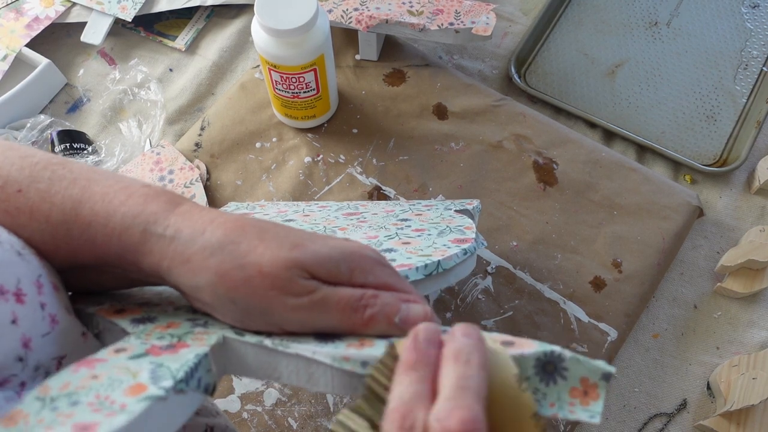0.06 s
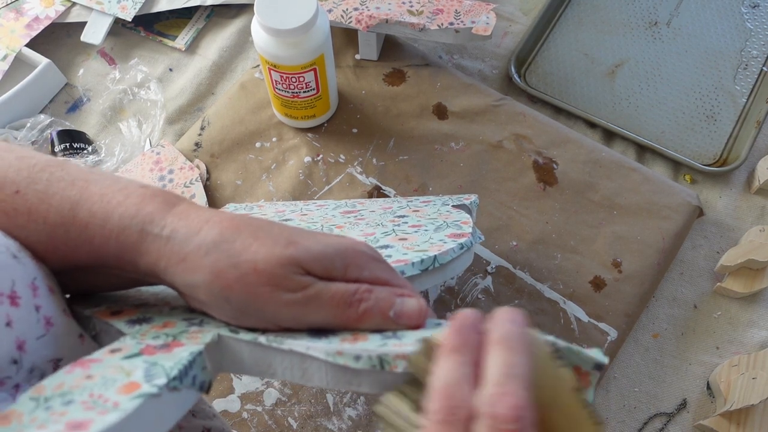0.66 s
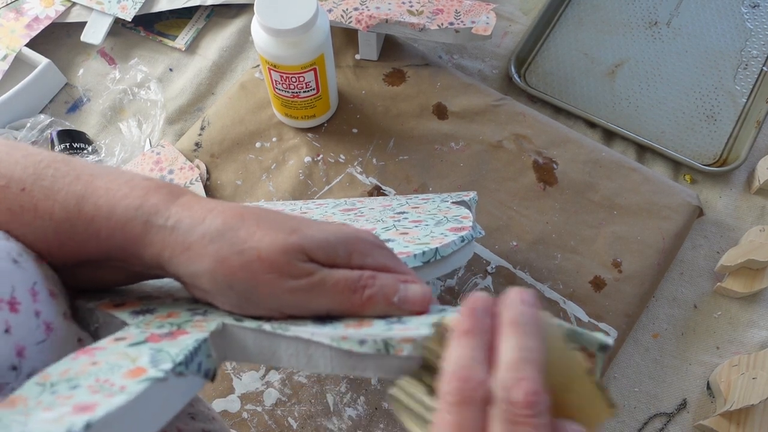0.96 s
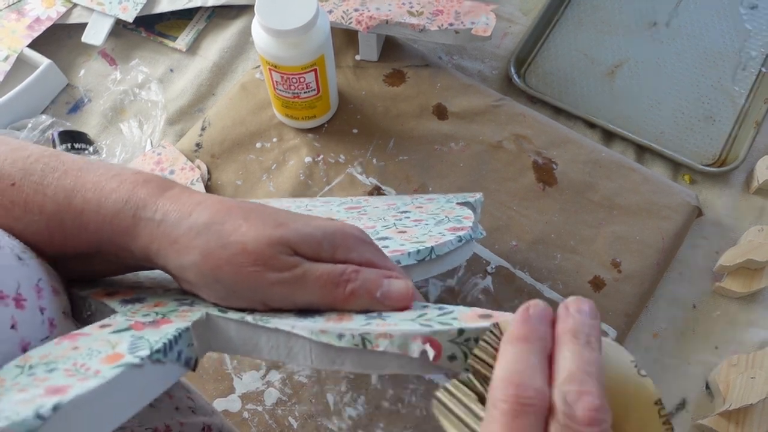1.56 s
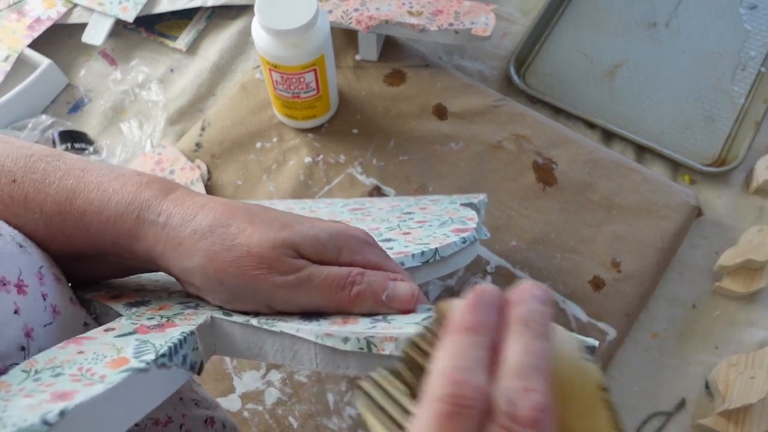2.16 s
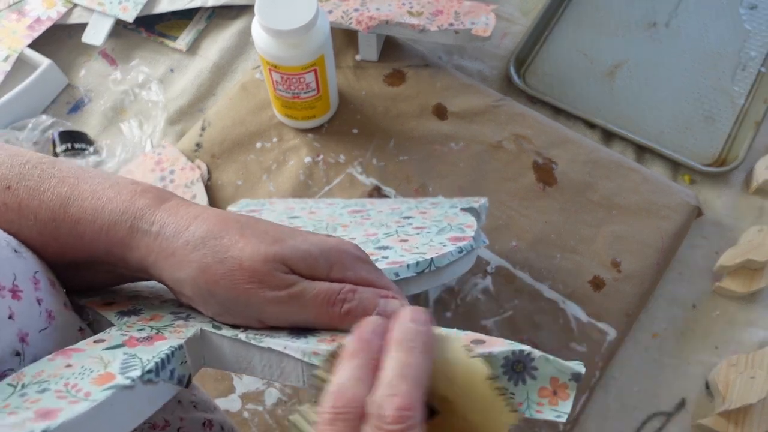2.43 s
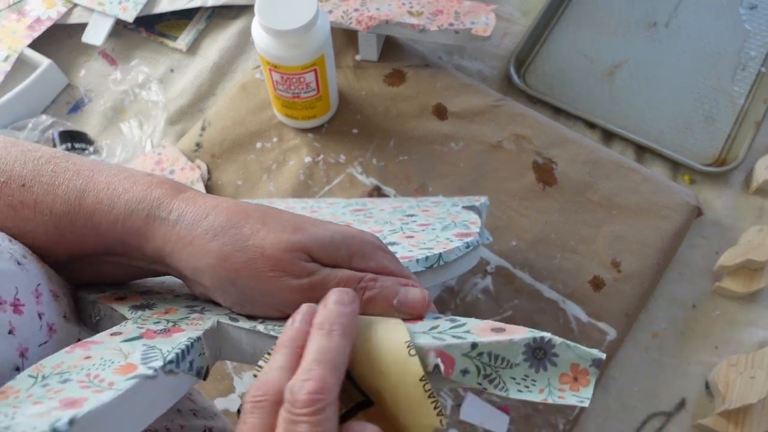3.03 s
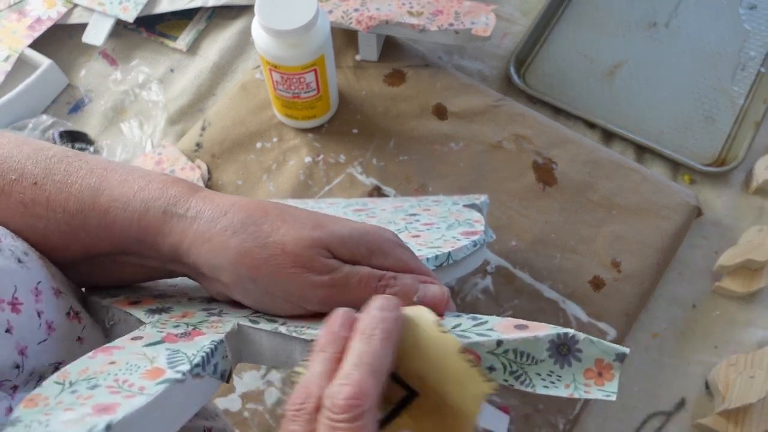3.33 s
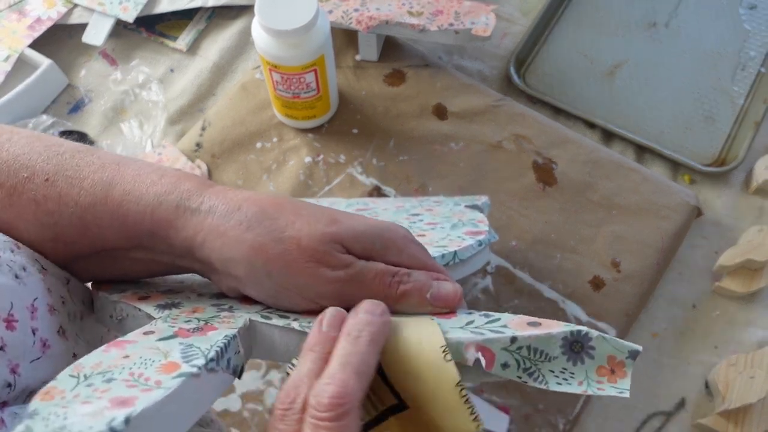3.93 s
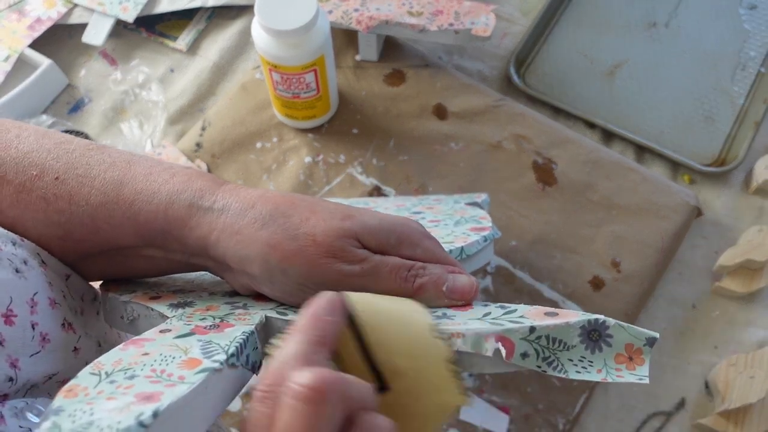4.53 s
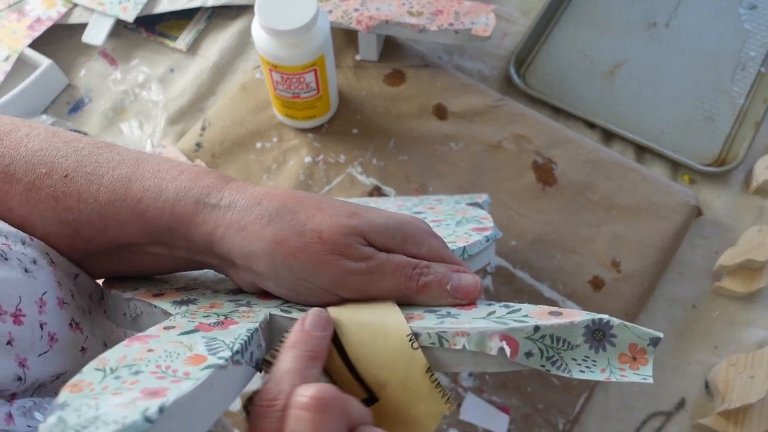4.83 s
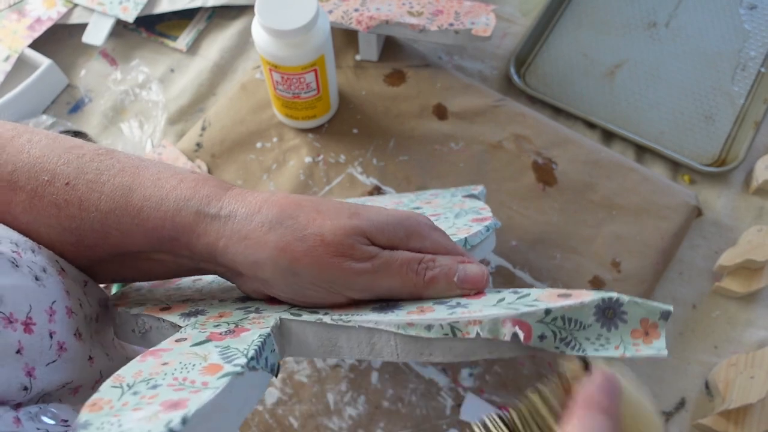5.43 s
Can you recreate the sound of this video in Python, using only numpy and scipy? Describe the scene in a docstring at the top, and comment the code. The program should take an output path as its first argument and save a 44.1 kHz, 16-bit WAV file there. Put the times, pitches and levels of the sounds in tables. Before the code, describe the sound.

A sanding pad scrapes along the paper-covered edge of a wooden cutout, right by the microphone in a small room. It starts with separate bright, gritty strokes, many landing with light taps. It then scrubs quickly to and fro before returning to single strokes with more knocks. The wood rings slightly hollow under the grit, and a faint room hush and distant motor hum lie behind.

```python
"""A sanding pad works the paper-covered edge of a wooden cutout, close to the microphone in a small room.
First long single strokes, many landing with a few taps, then quick scrubbing to and fro, then single
strokes again. Grains of grit snap through the fibres and ring the board and the hollow of the hand-held
pad. Behind the work lie the air of the room and the faint drone of a motor far away."""
import sys
import numpy as np
from scipy import signal
from scipy.fft import rfft, irfft
from scipy.io import wavfile
from scipy.ndimage import uniform_filter1d

SR = 44100
rng = np.random.default_rng(int(sys.argv[2]) if len(sys.argv) > 2 else 0)


def wav_record(signal):
    """Record a signal, one row per channel, as 16-bit PCM in the file named by sys.argv[1]."""
    frames = np.transpose(np.atleast_2d(signal))
    bounded = np.clip(frames, -1, 1)
    # unit amplitude maps onto the largest positive 16-bit level
    quanta = np.round(bounded * 32767).astype(np.int16)
    wavfile.write(sys.argv[1], SR, quanta)


N = 250912
TIME = np.arange(N) / SR
FFT_SIZE, TOP_HZ = 2 ** 15, 15950
HZ = np.maximum(np.arange(FFT_SIZE // 2 + 1) * SR / FFT_SIZE, 1)


def undb(db):
    """Decibels to gain."""
    return 10 ** (np.asarray(db) / 20)


def unit(x):
    """Scale to rms 1."""
    return x / np.sqrt(np.mean(np.abs(x) ** 2))


def fader(points):
    """Gain over time through (seconds, dB) points."""
    return undb(np.interp(TIME, *np.transpose(points)))


def colour(points):
    """Causal frequency response through (Hz, dB) points."""
    hz, db = np.transpose(points)
    gain = undb(np.interp(np.log(HZ), np.log(hz), db))
    cepstrum = irfft(np.log(gain))
    cepstrum[1:FFT_SIZE // 2] *= 2
    cepstrum[FFT_SIZE // 2 + 1:] = 0
    return np.exp(rfft(cepstrum))


def resonance(hz, q):
    """Response of one damped mode, 1 at its centre."""
    return 1 / (1 + 1j * q * (HZ / hz - hz / HZ))


def boost(hz, q, db):
    """A resonance standing db above an otherwise flat response."""
    return 1 + (undb(db) - 1) * resonance(hz, q)


def through(x, response):
    """Filter a sound by a frequency response."""
    impulse = irfft(response)[None, :FFT_SIZE // 4]
    return signal.fftconvolve(np.atleast_2d(x), impulse, axes=1)[:, :np.shape(x)[-1]]


def lowpass(x, hz):
    """Roll the treble off gently above hz."""
    return signal.sosfilt(signal.butter(1, hz, fs=SR, output="sos"), x)


def wander(rate):
    """Smooth random drift with about rate turns a second."""
    return np.interp(TIME * rate, np.arange(N), rng.standard_normal(N))


def piece(texture, start, count):
    """Take count samples of a running texture from a given time."""
    return np.take(texture, int(start * SR) + np.arange(count), axis=1, mode="wrap")


def add(out, start, x):
    """Mix a sound in at a time, trimmed at both ends."""
    first = int(round(start * SR))
    lo, hi = max(first, 0), min(first + x.shape[1], N)
    if hi > lo:
        out[:, lo:hi] += x[:, lo - first:hi - first]


# The air of the small room. Each row: frequency in Hz, relative level in dB.
AIR_SPECTRUM = [(25, -32), (60, -24), (140, -6), (600, -11.5), (16000, -45.5)]

def room_air(level_db=-52):
    """A low, steady hush all round the microphone."""
    return undb(level_db) * unit(through(rng.standard_normal(N), colour(AIR_SPECTRUM)))


# A motor, far off. Each row: loudest moment in seconds, half length in seconds, pitch in Hz, level in dB.
MOTOR_TONES = [(.7, 0.92, 79.5, -64), (1.25, 0.77, 157.6, -55), (5.1, 0.94, 131.3, -56.5)]

def distant_motor(waver=0.013):
    """Low tones swell and fade, wavering in pitch and level."""
    out = np.zeros(N)
    for peak_s, half_s, hz, db in MOTOR_TONES:
        phase = 2 * np.pi * np.cumsum(hz * (1 + waver * wander(5.26))) / SR
        swell = np.exp(-((TIME - peak_s) / half_s) ** 2)
        out += np.sqrt(2) * np.sin(phase) * swell * undb(db + wander(8.4))
    return out


def room_tail(x, wet_db=-17.5, low_t60_s=.47, treble_t60_s=.3):
    """The furnished room returns a soft diffuse tail, shorter in the treble."""
    t = TIME[:FFT_SIZE]
    noise = rng.standard_normal((2, FFT_SIZE))
    low = lowpass(noise, hz=4500)
    tail = low * undb(-60 * t / low_t60_s) + (noise - low) * undb(-60 * t / treble_t60_s)
    tail = unit(tail * (t > .006)) / np.sqrt(FFT_SIZE)
    return undb(wet_db) * signal.fftconvolve(x[None], tail, axes=1)[:, :N]


# How unlike the microphone's two ports hear the work. Each row: frequency in Hz, side gain in dB.
STEREO_WIDTH = [(300, -35), (2000, -17), (7000, -3)]
# The pad is off to the right, near the middle, then out again. Each row: time in seconds, side gain in dB.
PAD_POSITION = [(2.1, -7), (2.5, -6.5), (3.9, -11.5), (4.4, -7)]

def close_microphone(mid, side, lean=-0.31):
    """Mid and side become left and right; the treble leans to the right port."""
    side = through(side + lean * mid, colour(STEREO_WIDTH)) * fader(PAD_POSITION)
    return np.vstack([mid + side, mid - side])


# Modes of the held board. Each row: frequency in Hz, width in Hz, level in dB against the broad sound.
BOARD_MODES = [(367.7, 5.5, 1), (1229, 69, 0), (1344, 62, 4), (1508, 79, 0.5), (1840, 213, -1),
               (6430, 71, -22)]

def board(x, level_db=-0.5):
    """Whatever touches the edge rings the same wooden modes."""
    modes = sum(undb(db) * resonance(hz, hz / width) for hz, width, db in BOARD_MODES)
    return through(x, undb(level_db) * (1 + modes))


def grit(per_s, spread_db, judder_db, judder_rate):
    """Tiny snaps of grains tearing fibres, bunched by stick and slip; rows are mid and side."""
    hits = (rng.random(N) < per_s / SR) * rng.choice([-1, 1], N)
    strength = undb(spread_db * np.minimum(rng.exponential(size=N), 5))
    judder = undb(judder_db * wander(judder_rate))
    # each grain sits at its own place along the edge
    return unit(hits * strength * judder) * np.array([np.ones(N), rng.standard_normal(N)])


# Grit on paper and wood, heard close up. Each row: frequency in Hz, relative level in dB.
RASP_SPECTRUM = [(50, -53.5), (220, -14.5), (380, -8), (540, -16.5), (800, -2), (1000, -8), (1350, -8),
                 (3100, 1.5), (4800, -1), (6500, -0.5), (9000, -3.5), (11000, -9), (16000, -14.5)]

def rasp_response():
    """The bright colour shared by every scratch of the grit."""
    return unit(colour(RASP_SPECTRUM))


# Light contact while the pad turns round. Each row: time in seconds, level in dB.
RUB_LEVELS = [(0, -41.5), (.04, -51.5), (1.96, -52.5), (2.28, -79), (2.31, -37.5), (3.7, -38.5),
              (4.15, -42), (4.21, -52), (5.5, -42), (5.62, -34.5)]

def rubbing(grains, rasp):
    """Light rubbing makes the board hum hollowly."""
    return through(grains * fader(RUB_LEVELS), rasp * boost(hz=390, q=3.3, db=10))


# The board under a blow. Each row: frequency in Hz, relative level in dB.
THUD_SPECTRUM = [(40, -25), (210, 2.5), (780, 5.5), (1200, -4.5), (16000, -73)]
# The grit bites as the pad takes hold. Each row: start in seconds, level in dB, centre in Hz.
GRIT_BITES = [(0.0714, -26.5, 1900), (.629, -28.5, 2100), (.9055, -28.5, 2800), (.936, -29, 3000),
              (.972, -35, 3000), (1.1868, -28.5, 2000), (1.243, -20.5, 2800), (1.309, -20.5, 1400),
              (1.4772, -23.5, 3520), (1.534, -19.5, 3180), (1.722, -31.5, 3000), (1.7825, -22.5, 2710),
              (1.985, -25.5, 3100), (2.0379, -20.5, 3930), (2.293, -31.5, 1520), (2.585, -24, 5700),
              (3.2765, -25, 6050), (4.377, -26, 2000), (4.612, -24.5, 4000), (4.905, -26, 3500),
              (5.562, -20, 1700)]
# The pad knocks on the edge. Each row: start in seconds, crunch level in dB, crunch centre in Hz,
# thud level in dB, thud centre in Hz.
PAD_KNOCKS = [(.081, -18.5, 1960, -25, 267), (0.1119, -16.5, 2340, -27, 900), (.643, -15, 1400, -24.5, 687),
              (0.7962, -20, 1360, -44, 410), (0.9199, -19, 860, -29.5, 230), (1.198, -20, 2100, -32, 860),
              (1.4959, -25, 2850, -39, 576), (1.7321, -18, 2200, -33.5, 400),
              (1.7502, -14.5, 2180, -43, 180), (3.471, -19.5, 5200, -49, 350),
              (3.7149, -15, 2230, -48, 200), (4.2917, -27, 3680, -31, 364),
              (4.473, -13.5, 1690, -27.5, 775), (4.8691, -20.5, 4450, -42, 300),
              (4.8867, -20.5, 4300, -33.5, 700), (4.919, -17, 1190, -28, 430),
              (5.0992, -19.5, 1800, -30.5, 760), (5.116, -20, 2000, -34, 490),
              (5.1325, -16.5, 2050, -38, 480), (5.237, -21, 3100, -50, 900),
              (5.3126, -27.5, 1650, -35, 810), (5.347, -15, 1650, -41, 460),
              (5.3846, -12.5, 1210, -28, 785), (5.649, -19, 5850, -33, 250)]

def bites_and_knocks(rasp, snap=1.7, bite_thud_db=-20.5, bite_thud_hz=235):
    """The pad meets the edge: a snap, a crush of grit (long in a bite, short in a knock) and a thud."""
    out = np.zeros((2, N))
    blow = unit(colour(THUD_SPECTRUM))
    grains = grit(per_s=20000, spread_db=1, judder_db=4, judder_rate=650)
    # seconds for the soft pad to press home, the crunch to decay and the thud to decay
    bite_times, knock_times = (.002, .029, .029), (.001193, .0037, .0047)
    bites = [(*bite_times, s, db, hz, db + bite_thud_db, bite_thud_hz) for s, db, hz in GRIT_BITES]
    knocks = [(*knock_times, *row) for row in PAD_KNOCKS]
    t = TIME[:FFT_SIZE // 4]
    force = lambda press, decay: np.minimum(t / press, np.exp((press - t) / decay))
    for press, crunch_decay, thud_decay, start, crunch_db, crunch_hz, thud_db, thud_hz in bites + knocks:
        crush = piece(grains, start, len(t)) * force(press, crunch_decay)
        crush[0, int(press * SR)] += snap
        softness = 1 / (1 + 1j * HZ / (12 * crunch_hz))  # a soft, low contact has little treble
        crunch_tone = rasp * boost(crunch_hz, q=2.27, db=7.5) * softness
        add(out, start, undb(crunch_db) * through(crush, crunch_tone))
        shudder = piece(grains, start + 1, len(t)) * force(press, thud_decay)
        add(out, start, undb(thud_db) * through(shudder, blow * boost(thud_hz, q=6, db=11)))
    return out


def edge_spot(tilt_db, ripple_db=4.5, count=48):
    """Each spot on the edge favours other modes: random peaks and dips on a tilt in dB per octave."""
    tilt = colour([(hz, tilt_db * np.log2(hz / 3000)) for hz in (150, TOP_HZ)])
    ripple_hz = np.linspace(np.sqrt(150), np.sqrt(TOP_HZ), count) ** 2
    return tilt * colour(np.c_[ripple_hz, ripple_db * rng.uniform(-1, 1, count)])


# How the hand holds the pad. Each row: time in seconds, pad resonance in Hz, its height in dB,
# tilt in dB per octave.
PAD_GRIP = [(1.3, 3040, 1, .1), (2.1, 3300, 1.5, 3), (2.85, 3800, 8.5, -0.7), (3.2, 3060, 4.5, -0.1),
            (3.62, 2550, 5.5, -1.36), (3.8, 2730, 0.5, -4), (4.04, 3250, 3.5, 1.1), (4.42, 3960, 5, -0.44),
            (5.2, 3480, 7.5, 1), (5.45, 3580, 1.5, -0.3)]

def grip_at(s):
    """The grip sets the pad's resonance and the brightness of the scratch."""
    times, *controls = np.transpose(PAD_GRIP)
    return [np.interp(s, times, control) for control in controls]


# Single strokes along the edge, close to the microphone. Each row: moment of top speed in seconds,
# slowing time in seconds, level in dB, height of the woody resonance in dB.
SINGLE_STROKES = [(0.176, 0.068, -17.5, -1), (0.265, 0.032, -26, 5.5), (.357, .021, -35, 9.5),
                  (0.467, .059, -18, .5), (0.732, 0.076, -18.5, 2.5), (1.012, 0.067, -18.5, -0.5),
                  (1.3, .068, -20.5, 6), (1.574, .047, -20.5, 1.5), (1.824, .056, -22, 1.5),
                  (2.077, 0.051, -22.5, 7), (4.041, 0.033, -18, -1.5), (4.432, .06, -17.5, -10),
                  (4.54, 0.017, -27, -6), (4.712, .072, -18, -5), (4.975, 0.049, -22, -3.5),
                  (5.194, .048, -20.5, 4.5), (5.419, 0.074, -20.5, -5), (5.583, 0.022, -29, 18)]

def strokes(rise_share=.7):
    """Single movements of the pad, each speeding up faster than it slows."""
    for peak_s, fall, db, wood_db in SINGLE_STROKES:
        yield (peak_s, rise_share * fall, fall, db, wood_db, *grip_at(peak_s))


# Quick scrubs, just as close, out and back in turn.
# Each row: moment of top speed in seconds, rise time in seconds, level in dB.
QUICK_SCRUBS = [(2.399, 0.031, -25), (2.52, 0.038, -21.5), (2.63, 0.054, -21), (2.742, 0.041, -21.5),
                (2.848, 0.038, -16), (2.965, 0.038, -20), (3.071, .038, -19), (3.184, 0.04, -21),
                (3.289, 0.042, -22.5), (3.405, 0.031, -19.5), (3.508, .038, -21.5), (3.622, .038, -20),
                (3.712, 0.044, -27), (3.853, 0.024, -26), (3.918, 0.026, -30.5)]

def scrubs(fall_share=0.66, first_wood_db=5, wood_db_per_s=-7):
    """Movements to and fro; the woody resonance fades as they work towards the holding hand."""
    for k, (peak_s, rise, db) in enumerate(QUICK_SCRUBS):
        pad_hz, pad_db, tilt_db = grip_at(peak_s)
        wood_db = first_wood_db + wood_db_per_s * (peak_s - QUICK_SCRUBS[0][0])
        if k % 2 == 0:  # pressed on an outward scrub, the pad rings lower and the wood rings more
            pad_hz, pad_db, wood_db = 2330, 8, wood_db + 1
        yield peak_s, rise, fall_share * rise, db, wood_db, pad_hz, pad_db, tilt_db


def sanding(grains, rasp, movements, pad_glide=0.018, brighten_db_per_octave=.5):
    """Each movement speeds up and dies away, its grit ringing the wood and the hollow of the pad."""
    out = np.zeros((2, N))
    dull = lowpass(grains, hz=5000)
    for peak_s, rise, fall, db, wood_db, pad_hz, pad_db, tilt_db in movements:
        t = np.arange(-3 * rise, 3 * fall, 1 / SR)
        speed = np.exp(-np.where(t < 0, np.abs(t / rise) ** 1.93, np.abs(t / fall) ** 1.67))
        # faster grit makes sharper snaps, so the treble comes last and leaves first
        sharp = speed ** 0.26
        snaps = sharp * piece(grains, peak_s, len(t)) + (1 - sharp) * piece(dull, peak_s, len(t))
        scratch = undb(db) * speed * snaps
        wood = boost(hz=1400, q=1.74, db=wood_db)
        # the pad slides from spot to spot, heavy then light: it brightens and its resonance rises
        travel = (1 + np.tanh(4 * t / (rise + fall))) / 2
        for share, way in ((1 - travel, -1), (travel, 1)):
            spot = edge_spot(tilt_db + way * brighten_db_per_octave)
            pad = boost(pad_hz * (1 + way * pad_glide), q=3.1, db=pad_db)
            add(out, peak_s + t[0], through(scratch * share, rasp * wood * pad * spot))
    return out


def scene():
    """Pad and board right at the microphone, the small room around them, the motor far behind."""
    rasp = rasp_response()
    fine = grit(per_s=20000, spread_db=2, judder_db=3, judder_rate=300)
    coarse = grit(per_s=160, spread_db=2, judder_db=0, judder_rate=0)  # snags fibres and crackles
    grains = fine + undb(-14) * coarse
    scratches = sanding(grains, rasp, [*strokes(), *scrubs()])
    mid, side = board(rubbing(grains, rasp) + bites_and_knocks(rasp) + scratches)
    return close_microphone(mid, side) + room_tail(mid) + room_air() + distant_motor()


def record(dry, limit_db=-12.5, ceiling=.7):
    """A quick limiter holds down the loudest moments and rounds the tallest peaks; the top is cut."""
    power = uniform_filter1d(np.mean(dry ** 2, axis=0), size=60)
    loudness = np.sqrt(np.abs(power))
    held = dry * (1 + (loudness / undb(limit_db)) ** 4) ** -.25
    rounded = held * (1 + (held / ceiling) ** 4) ** -.25
    return signal.sosfilt(signal.ellip(10, .2, 75, TOP_HZ, fs=SR, output="sos"), rounded)


dry = scene()
out = record(dry)
wav_record(out)
```